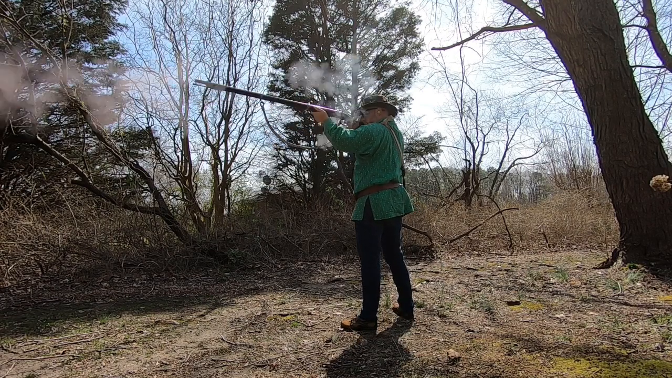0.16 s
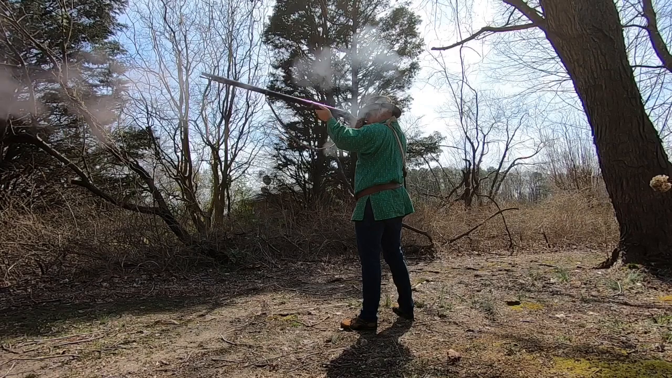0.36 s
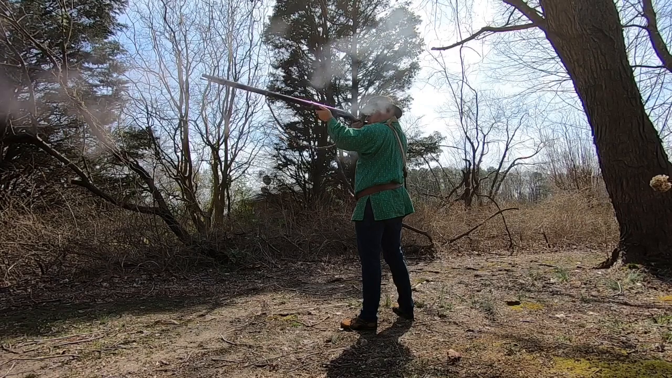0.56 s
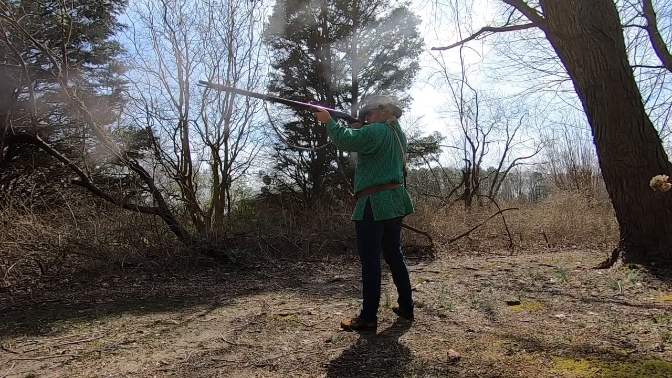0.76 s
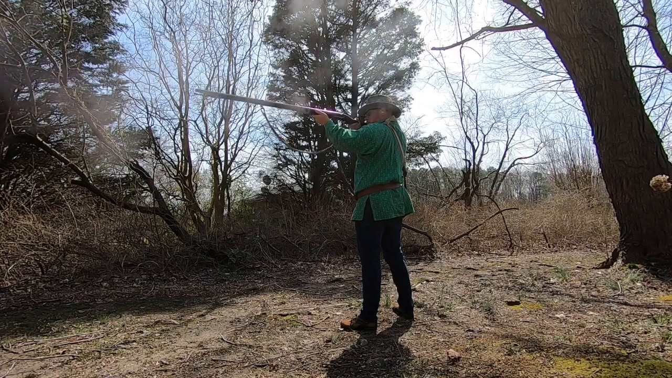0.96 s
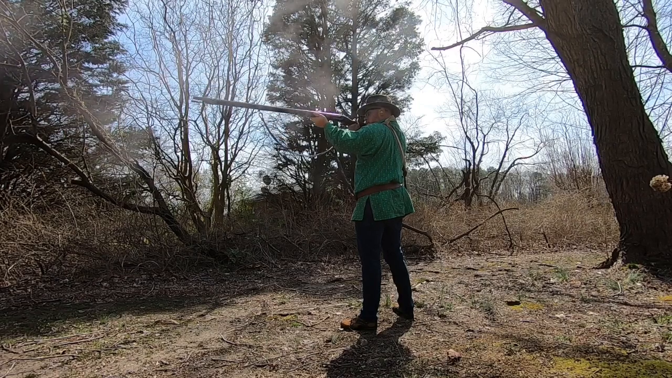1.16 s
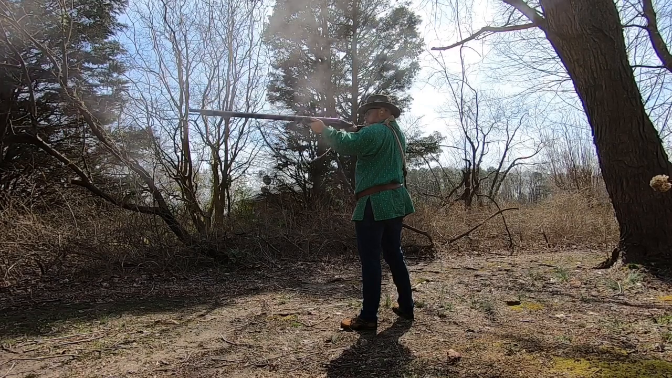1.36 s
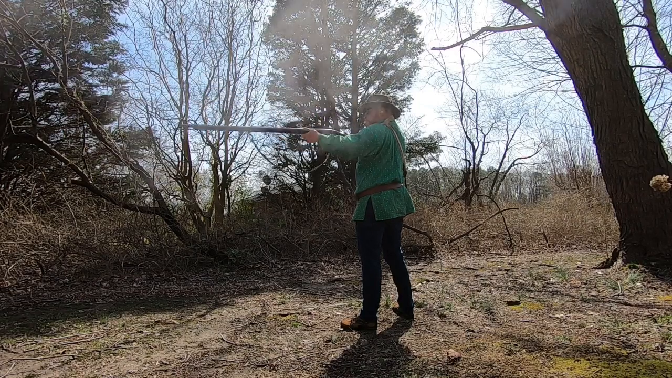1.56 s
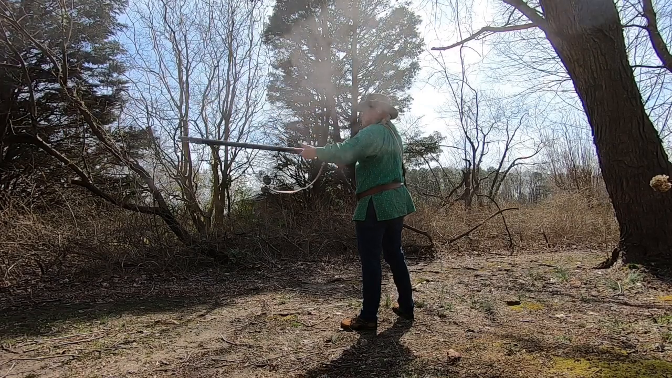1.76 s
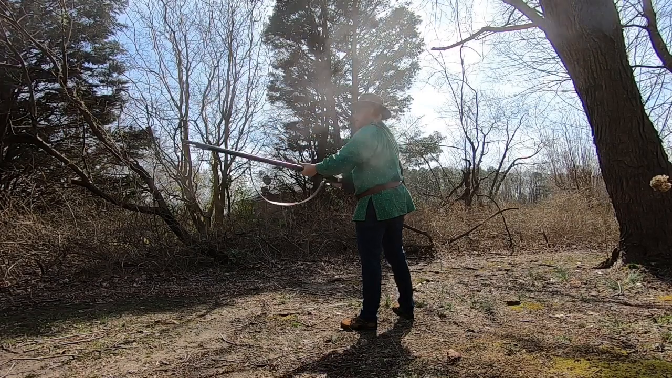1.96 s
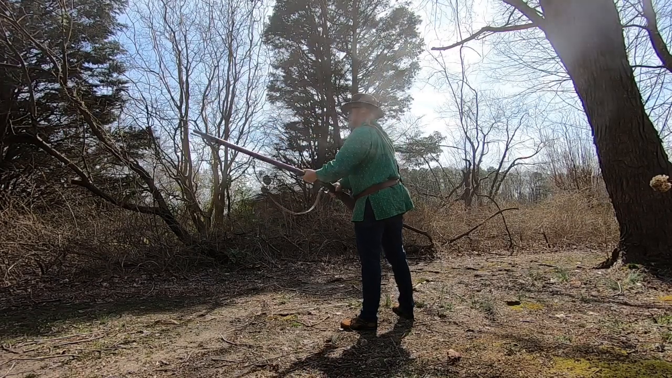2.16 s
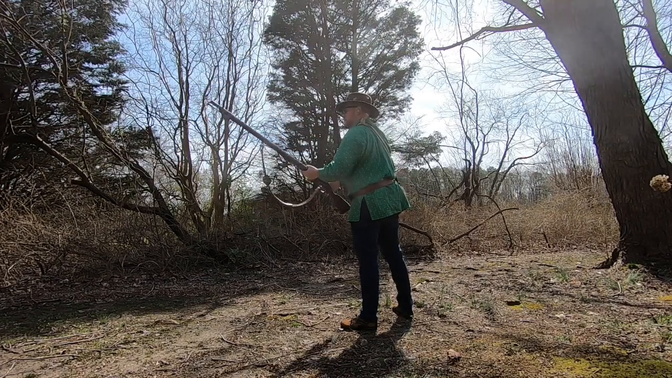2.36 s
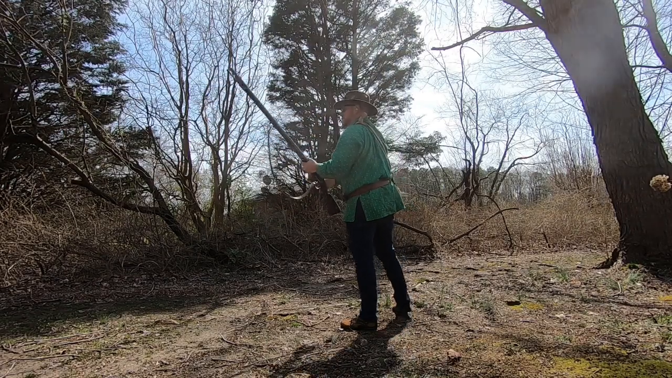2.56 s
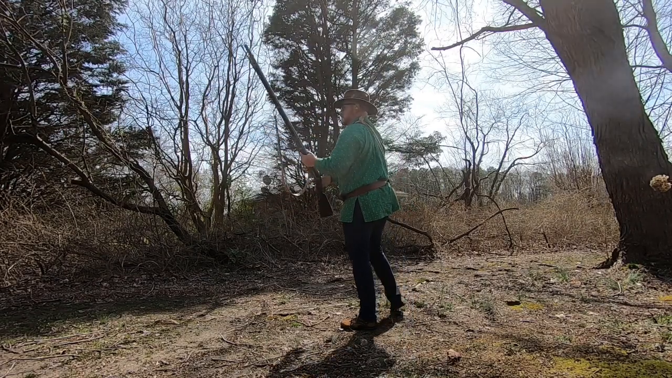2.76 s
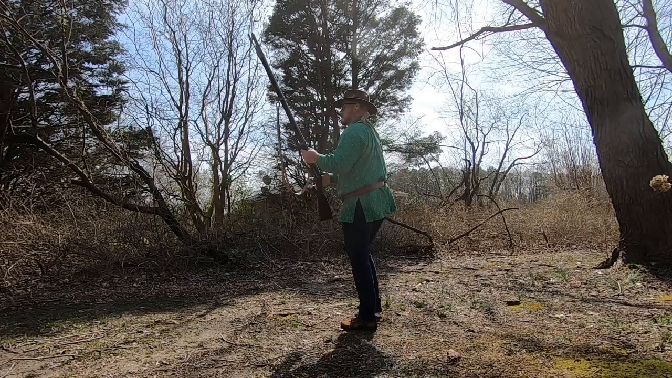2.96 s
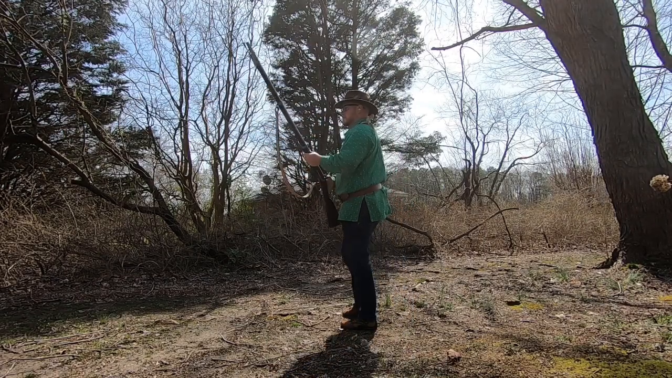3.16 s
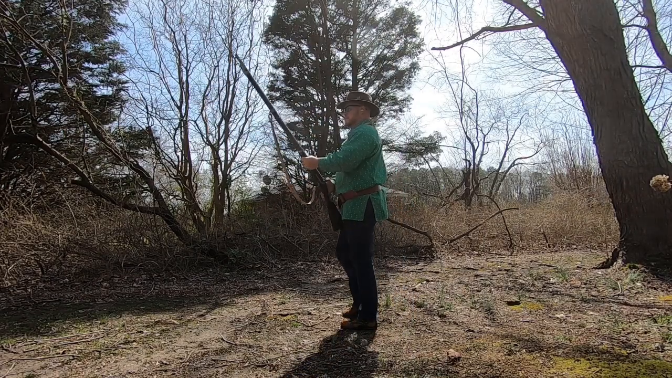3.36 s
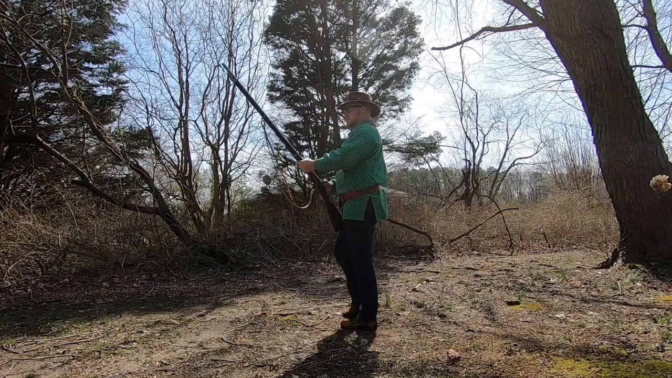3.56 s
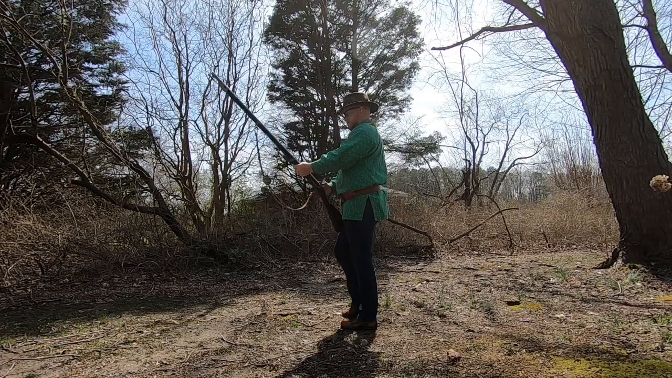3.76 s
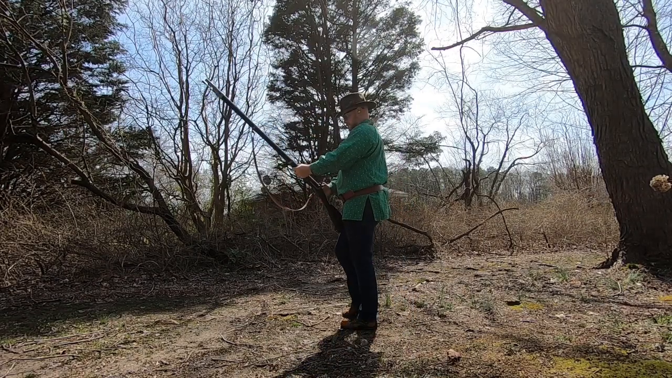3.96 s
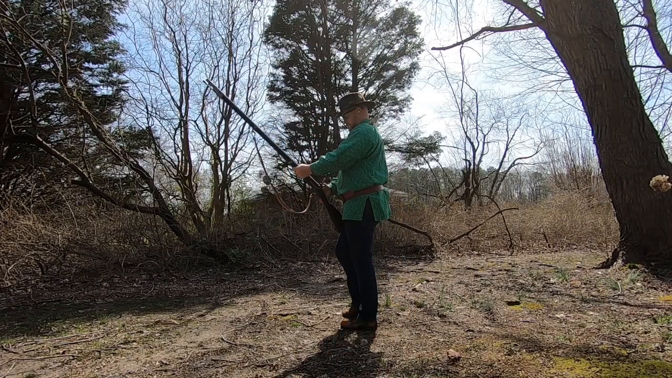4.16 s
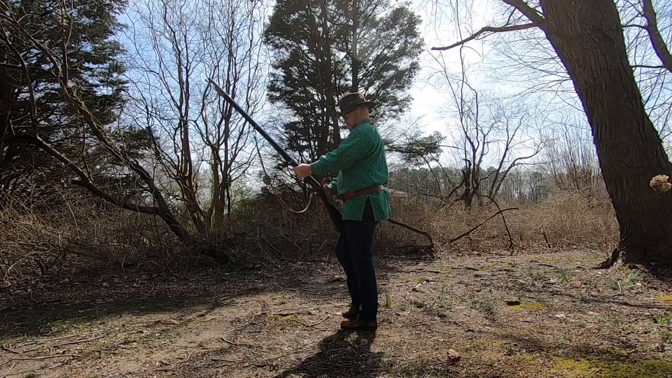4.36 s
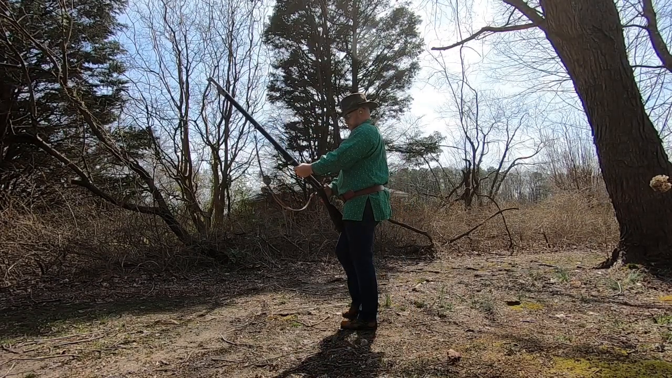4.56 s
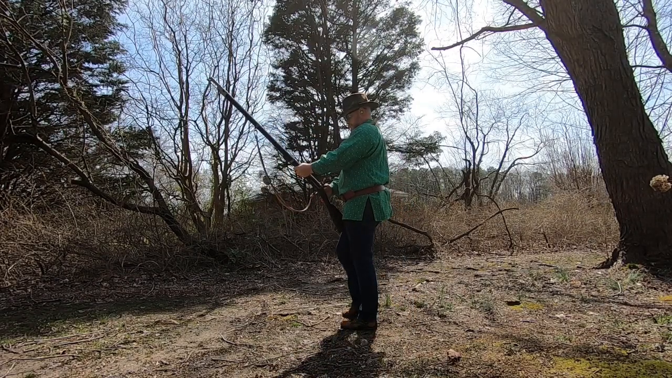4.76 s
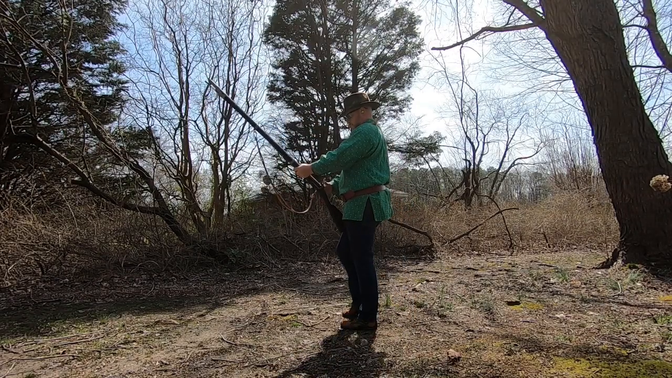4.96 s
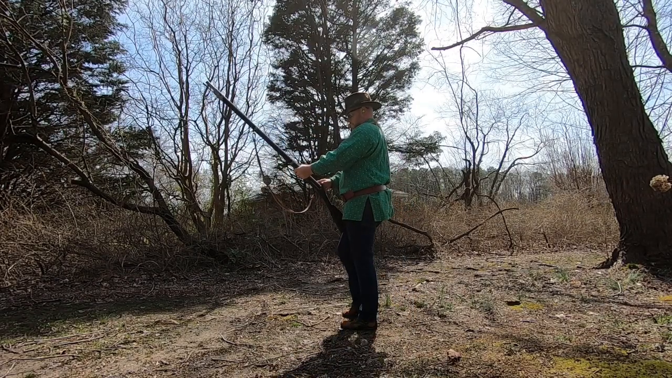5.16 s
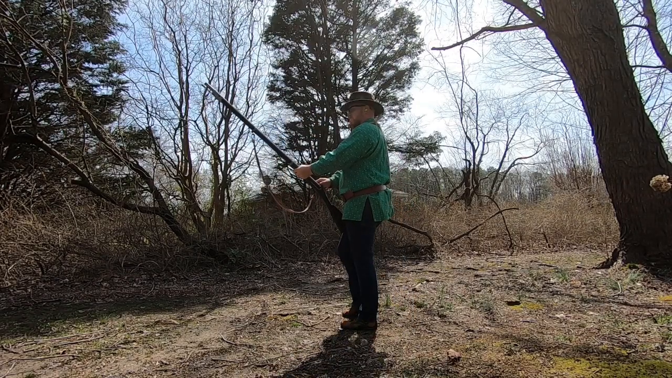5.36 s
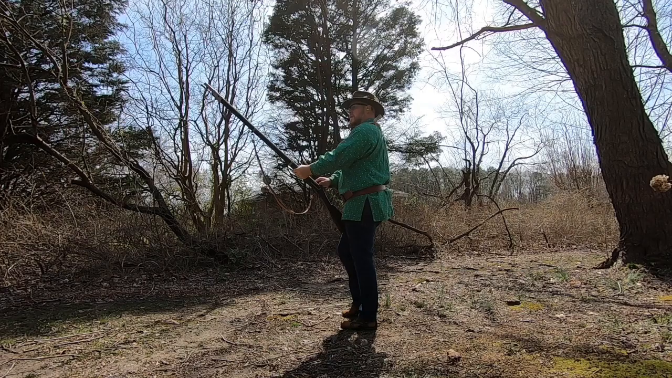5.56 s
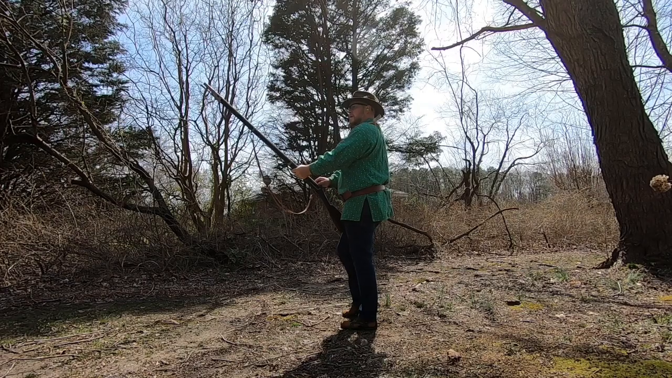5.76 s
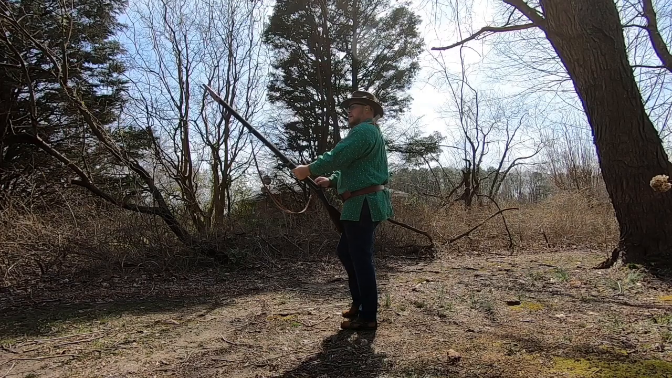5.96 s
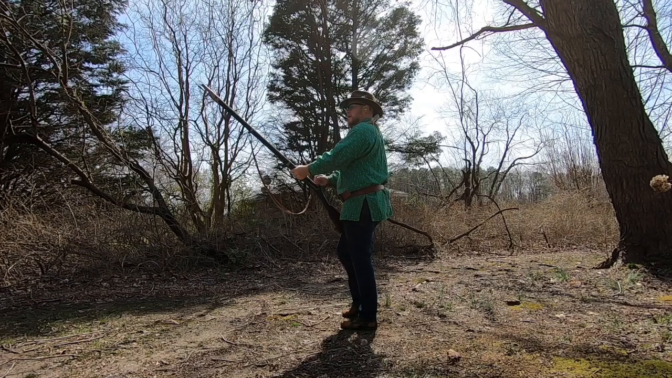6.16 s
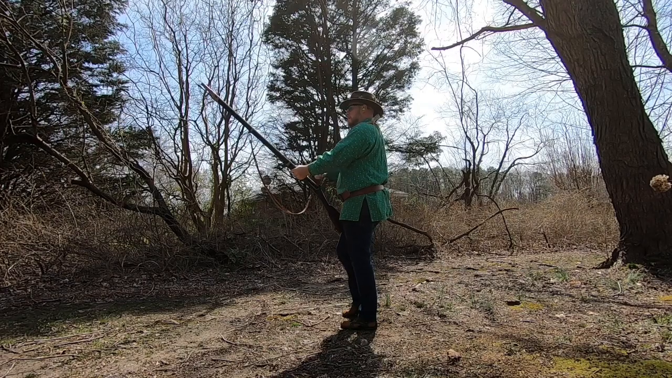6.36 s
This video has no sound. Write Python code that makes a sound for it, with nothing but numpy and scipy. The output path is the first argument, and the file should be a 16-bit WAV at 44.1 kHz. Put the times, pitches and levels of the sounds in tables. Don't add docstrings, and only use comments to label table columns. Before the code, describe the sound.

Overloaded gunshot echo decays among trees into low fluttering microphone wind, with faint metal clicks, a sling slap, and a bright steel clack near the end.

```python
import sys
import numpy as np
from scipy import signal
from scipy.fft import rfft, irfft, next_fast_len
from scipy.io import wavfile
from scipy.ndimage import uniform_filter1d

SR = 44100
rng = np.random.default_rng(int(sys.argv[2]) if len(sys.argv) > 2 else 0)


def to_wav(s):
    ch = np.atleast_2d(s).T
    pcm = np.round(np.clip(ch, -1, 1) * 32767)
    wavfile.write(sys.argv[1], SR, pcm.astype(np.int16))


def amplitude_ratio(level_db):
    exponent = np.asarray(level_db, float) / 20
    return 10 ** exponent


N = 282240


def unit(x):
    return x / np.sqrt(np.mean(x ** 2) + 1e-20)


def along(points, hz):
    f, v = np.transpose(points)
    return np.interp(np.log(hz + 1), np.log(f + 1), v)


def coloured(spectrum, size):
    hz = np.fft.rfftfreq(size, 1 / SR)
    return unit(irfft(rfft(rng.standard_normal(size)) * amplitude_ratio(along(spectrum, hz)), size))


def evened(x, span_s):
    power = np.abs(uniform_filter1d(x ** 2, int(span_s * SR)))
    return unit(x / (power + .05) ** .5)


def swell(t, peak_s, db, rise_s, t60_s):
    rise_db = -10 * ((t - peak_s) / max(rise_s, .005)) ** 2
    fall_db = -60 * (t - peak_s) / t60_s
    return amplitude_ratio(db + np.where(t < peak_s, rise_db, fall_db))


def hump(hz, octaves):
    steps = np.arange(-3, 4)
    return np.transpose([hz * 2 ** (octaves * steps), -6 * steps ** 2])


def ring(modes, t):
    out = 0
    for hz, db, t60_s in modes:
        out = out + amplitude_ratio(db + rng.normal(0, 1) - 60 * t / t60_s) * np.sin(2 * np.pi * hz * t)
    return out


def country_hiss(t):
    # hz, db_per_hz
    shared_spectrum = [(71, -34.5), (120, 5), (241, -4), (427, -6.5), (473, -7.5), (580, -7.5), (643, -7),
                       (1430, -14.5), (1550, -15), (2150, -18.5), (12800, -24), (16000, -25.5)]
    # hz, db_per_hz
    apart_spectrum = [(100, -25), (300, 1), (800, -1), (1500, -4), (4000, 0), (15000, -4)]
    level_db, first_drop_db, recovery_s = -54.5, -60, .46
    gain = amplitude_ratio(level_db + first_drop_db * np.exp(-t / recovery_s))
    shared = gain * coloured(shared_spectrum, N)
    wobble_db = 3 * coloured([(1, -1), (15, 1.5), (30, -61)], N)
    return shared, amplitude_ratio(-28.5 + wobble_db) * gain * coloured(apart_spectrum, N)


def eddies(t):
    # start_s, strength_db
    breeze_points = [(0.2, -54), (0.8, -50), (1.6, -40), (2.9, -39), (3.9, -39), (4.6, -29), (5.2, -49),
                     (6.4, -45)]
    # peak_s, strength_db, half_length_s, flutter_over_throb_db
    crossings = [(.77, -50, .047, 10), (.94, -40, .09, -10), (1.22, -35, .08, -13),
                 (1.37, -33.5, .065, -18), (1.59, -38, .11, -2), (1.86, -37, .1, -3),
                 (1.98, -28, .037, -11), (2.12, -31, .03, -12), (2.32, -29, .06, -13),
                 (2.42, -27, .03, -16), (2.545, -26, .05, -30), (2.86, -31, .036, -25),
                 (3.0, -32, .03, -20), (3.13, -28.5, .025, -25), (3.36, -39.5, .072, -20),
                 (3.51, -33, .069, -12), (3.73, -35, .048, -10), (4.11, -26.5, .1, -18),
                 (4.28, -27, .085, -6), (4.47, -33.5, .025, 2), (4.53, -20, .03, -25),
                 (4.79, -24.5, .045, -13), (4.92, -26, .024, 0), (4.995, -17, .064, -2),
                 (5.19, -39.5, .075, -13), (5.32, -33, .025, -9), (5.47, -34, .065, -24),
                 (5.71, -36, .16, -10), (6.02, -36.5, .025, -17), (6.38, -36, .15, -18)]
    breeze_flutter_db = -14.5
    coarse = t[::32]
    s, db, half_s, flutter_db = np.transpose(crossings)
    bells = amplitude_ratio(db[:, None] - 10 * ((coarse - s[:, None]) / half_s[:, None]) ** 2)
    breeze = amplitude_ratio(np.interp(coarse, *np.transpose(breeze_points)))
    slow = breeze + bells.sum(0)
    quick = amplitude_ratio(breeze_flutter_db) * breeze + amplitude_ratio(flutter_db) @ bells
    return np.interp(t, coarse, slow), np.interp(t, coarse, quick)


def wind(t):
    # hz, db_per_hz
    throb_spectrum = [(5, -12), (20, -2), (38, -3.5), (52, -7.5), (70, -27.5), (200, -78.5)]
    # hz, db_per_hz
    flutter_spectrum = [(30, -38.5), (60, 0), (90, -2.5), (140, -13.5), (250, -40.5), (500, -93)]
    # hz, db_per_hz
    thump_spectrum = [(80, -32.5), (140, 8.5), (250, -12.5), (350, -24), (800, -66)]
    # peak_s, level_db, rise_s, t60_s
    gust = (5.005, -27.5, .09, .14)
    # peak_s, level_db, rise_s, t60_s
    muzzle = (5.125, -54, .07, .06)
    muzzle_hz = 420
    slow, quick = eddies(t)
    throb = slow * evened(coloured(throb_spectrum, N), span_s=.07)
    flutter = quick * evened(coloured(flutter_spectrum, N), span_s=.06)
    thump = swell(t, *gust) * evened(coloured(thump_spectrum, N), span_s=.03)
    hoot = swell(t, *muzzle) * np.sin(2 * np.pi * muzzle_hz * t)
    return throb + flutter + thump + hoot


def contacts():
    # start_s, level_db
    swings = [(.738, -56.5), (.8237, -43.5), (.835, -49), (.8691, -46), (.907, -57), (.9604, -52),
              (2.642, -53)]
    # start_s, level_db
    rattle = [(1.7895, -35), (1.81, -40), (1.836, -39), (1.866, -38), (1.883, -35), (4.527, -45)]
    # start_s, level_db, knock_hz
    grips = [(2.9835, -50, 2500), (3.2423, -37, 1700), (3.2555, -43, 2060), (3.267, -38.5, 2600),
             (3.479, -47, 2400), (3.49, -36, 2290)]
    # start_s, level_db, knock_hz
    knocks = [(1.786, -37, 760), (2.998, -55.5, 1500), (3.017, -58, 1350), (3.033, -55, 1090),
              (4.5405, -50, 1960), (4.592, -58, 1950), (5.6245, -61, 2000)]
    # start_s, level_db, pitch_hz, t60_s
    blows = [
        (.1112, -19, 5300, .0088),
        (1.7824, -20, 2100, .018),
        (1.7843, -25, 1500, .03),
        (1.7952, -26, 3400, .022),
        (1.798, -38, 2300, .26),
    ]
    # start_s, tick_db, tick_hz, knock_db, knock_hz
    snap = [
        (4.4017, -33, 6000, -40, 2000),
        (4.4057, -22, 6000, -22.5, 6000),
        (4.4086, -2, 11000, -13, 4200),
        (4.4092, -23, 550, -3.5, 9200),
        (4.4104, -13.5, 3900, -14, 4600),
        (4.4095, -20, 1300, -17, 2107),
        (4.417, -22, 9000, -27, 1900),
    ]
    blow_knock_db, snap_t60_s = -12, .015
    swivel_knock_hz, buckle_knock_hz = 2000, 3300
    kinds = [  # tick_hz, knock_over_tick_db, t60_s, rows
        (6800, -25, .024, [(*row, swivel_knock_hz) for row in swings]),
        (7400, -4, .03, [(*row, buckle_knock_hz) for row in rattle]),
        (5800, -5, .027, grips),
        (3500, 8, .036, knocks)]
    out = []
    for tick_hz, knock_db, t60_s, rows in kinds:
        out += [(s, db, tick_hz, db + knock_db, hz, t60_s) for s, db, hz in rows]
    out += [(s, db, hz, db + blow_knock_db, hz, t60_s) for s, db, hz, t60_s in blows]
    return out + [(*row, snap_t60_s) for row in snap]


def trunks(t):
    # hz, db_per_hz
    bark = [(500, -30), (1400, -13), (1900, -3), (2800, -0.5), (4800, -0.5), (6500, -10), (10000, -3.5),
            (16000, -15.5)]
    gap = 1 - 0.85 * np.exp(-(t / .025) ** 2)
    return coloured(bark, len(t)) * amplitude_ratio(-60 * t / 0.34) * gap


def handling():
    # pitch_hz, level_db, t60_s
    swivel_modes = [(4400, -11, .1), (9300, -4, .17), (12020, -9, .09)]
    # pitch_hz, level_db, t60_s
    spring_modes = [(1940, -20, .2), (2700, -22.5, .5), (9238, -20.5, .14), (10440, -20, .14),
                    (12020, 0.5, 0.24)]
    # start_s, level_db
    swivel_rings = [(.826, -49), (1.884, -60), (3.244, -53), (3.268, -58), (3.491, -60)]
    out, t = np.zeros(N + SR), np.arange(16384) / SR
    brief = t[:4096]
    for s, tick_db, tick_hz, knock_db, knock_hz, t60_s in contacts():
        start = round(s * SR)
        tick = amplitude_ratio(tick_db - 2.5) * coloured(hump(tick_hz, octaves=0.79), len(brief))
        knock = amplitude_ratio(knock_db) * coloured(hump(knock_hz, octaves=0.29), len(brief))
        envelope = amplitude_ratio(-60 * brief / max(t60_s, .003)) * (1 - np.exp(-brief / .0003))
        out[start:][:len(brief)] += (tick + knock) * envelope
        strength = np.sqrt((amplitude_ratio(tick_db) ** 2 + amplitude_ratio(knock_db) ** 2) * t60_s)
        out[start:][:len(t)] += amplitude_ratio(-15.5) * strength * trunks(t)
    for s, db in swivel_rings:
        out[round(s * SR):][:len(t)] += amplitude_ratio(db) * ring(swivel_modes, t)
    free = 1 + 3.5 / (1 + np.exp(np.clip((t - .008) / 0.00054, -50, 50)))
    out[round(4.4102 * SR):][:len(t)] += amplitude_ratio(-26) * free * ring(spring_modes, t)
    return out[:N]


def diaphragm(t):
    return 0.2 * np.exp(-t / 0.1) - 0.38 * np.exp(-t / 0.023)


def woods(t):
    # peak_s, level_db, rise_s, t60_s, treble_loss_db
    returns = [
        (0, -19.8, .01, .72, 0),
        (.08, -34, .05, 1.55, -10),
        (.55, -44.5, .3, 4, -4.5),
        (.75, -37.5, .16, 2.4, -20),
        (1.6, -41.5, .6, 7.5, -21),
        (1.75, -49.5, .6, 1.5, -4),
    ]
    power = np.array([swell(t, *row[:-1]) ** 2 for row in returns])
    kept = amplitude_ratio(np.transpose(returns)[-1]) ** 2
    return 10 * np.log10(power.sum(0) + 1e-12), 10 * np.log10(kept @ power + 1e-14)


def echoes(patchy_db=1.54):
    # hz, db_per_hz
    blast = [(35, -35), (60, -2), (168, -6.5), (308, -1), (427, -7), (480, -6), (1170, -10.5), (1820, -9.5),
             (2090, -12.5), (8920, -19), (16000, -27.5)]
    # hz, share
    dulling = [(60, 0.2), (700, 0.2), (1500, 0.5), (2200, 1.0), (4000, 1.1), (16000, 1.1)]
    # hz, db_per_s
    air_loss = [(60, -3.5), (2500, 1.5), (4000, 20.5), (7000, 47.5), (14000, 83)]
    # hz, level_db
    ground = [(60, -8.5), (130, 2), (250, -3.5), (450, 2), (690, -1.5), (900, -4.5), (1150, 4.5),
              (1400, 0.5), (1950, 2), (2150, -2), (2380, 3.5), (2650, 0.5), (3200, 2.5), (16000, -1.5)]
    hz, t, z = signal.stft(rng.standard_normal(N), SR, nperseg=512)
    low_db, high_db = woods(t)
    tilt_db = high_db - low_db - high_db[0] + low_db[0]
    colour_db = along(blast, hz)[:, None] + along(dulling, hz)[:, None] * tilt_db
    colour_db = colour_db + along(ground, hz)[:, None] * (1 - np.exp(-t / .25))
    colour = amplitude_ratio(colour_db - along(air_loss, hz)[:, None] * t)
    bass = (hz > 200) & (hz < 800)
    colour /= np.sqrt(np.sum(colour[bass] ** 2, 0) / len(hz))
    patches = uniform_filter1d(rng.standard_normal(z.shape), 10, 0)
    patches = unit(uniform_filter1d(patches, 8, 1))
    z = z * colour * amplitude_ratio(low_db + 0.43 + patchy_db * patches)
    return signal.istft(z, SR, nperseg=512)[1][:N]


def slaps(t):
    # centre_s, level_db, pitch_hz
    booms = [(.0019, -11, 2000), (.002, -11, 500), (.0122, -8, 330), (.0197, -8, 300), (.025, -3.5, 400),
             (.033, -12.5, 520), (.041, -14, 600), (.05, -20, 450), (.0735, -12.5, 400), (.096, -17, 330),
             (.1113, -8, 5000)]
    early = t[:SR // 5]
    pushes = np.zeros(len(early))
    for s, db, hz in booms:
        bell = np.exp(-((early - s) * hz / .7) ** 2)
        pushes -= amplitude_ratio(db) * np.cos(2 * np.pi * hz * (early - s)) * bell
    return np.pad(pushes, (0, N - len(early)))


def scene():
    t = np.arange(N) / SR
    hiss, hiss_apart = country_hiss(t)
    gun = handling()
    shot = echoes() + slaps(t)
    mono = shot + diaphragm(t) + wind(t) + gun + hiss
    rough = amplitude_ratio(-28) * np.gradient(shot + amplitude_ratio(-9) * gun) * rng.standard_normal(N)
    side = rough + hiss_apart
    return np.array([mono + side, mono - side])


def low_pass(x):
    return signal.sosfilt(signal.butter(12, 16270, fs=SR, output="sos"), x)


def record(dry):
    top_hz, offset, ceiling = 15850, -.0046, .99
    size = next_fast_len(N + SR)
    hz = np.fft.rfftfreq(size, 1 / SR)
    passed = np.clip((top_hz + 250 - hz) / 500, 0, 1)
    x = irfft(rfft(dry, size) * passed, size)[:, :N] + offset
    x = x / (1 + np.abs(x / ceiling) ** 8) ** (1 / 8)
    return low_pass(x)


dry = scene()
out = record(dry)
to_wav(out)
```